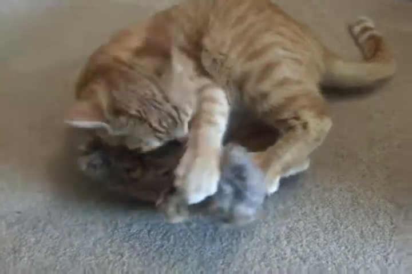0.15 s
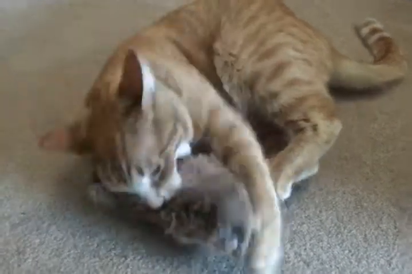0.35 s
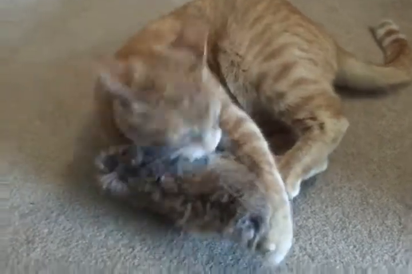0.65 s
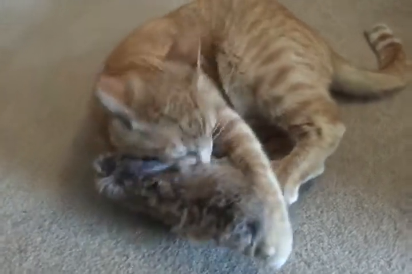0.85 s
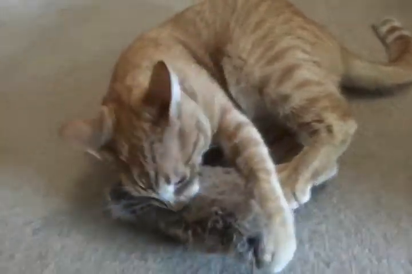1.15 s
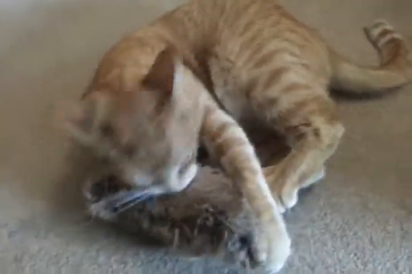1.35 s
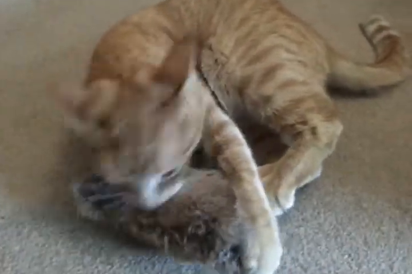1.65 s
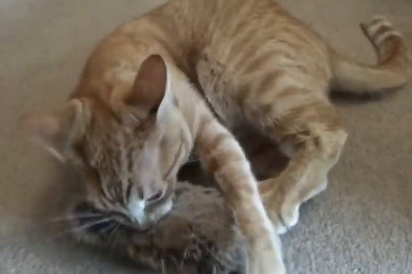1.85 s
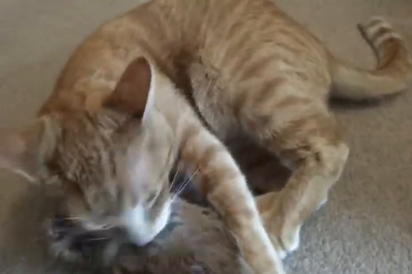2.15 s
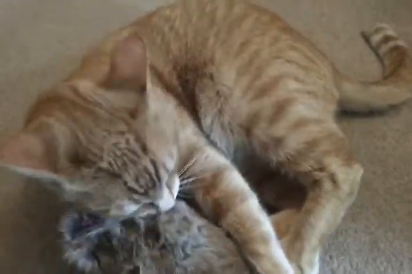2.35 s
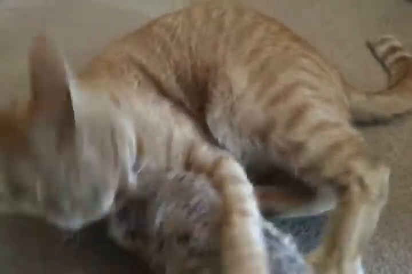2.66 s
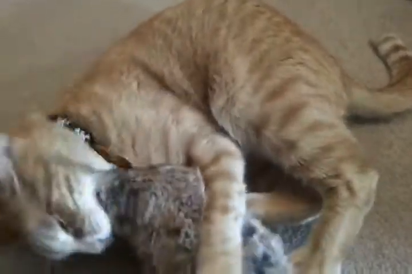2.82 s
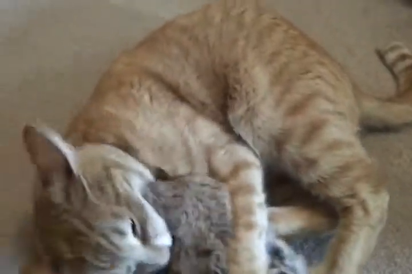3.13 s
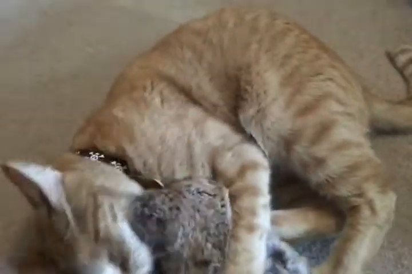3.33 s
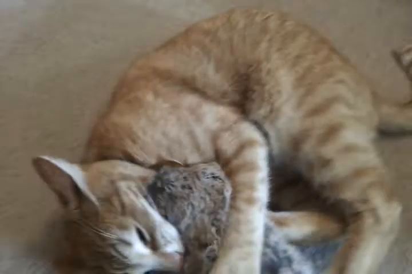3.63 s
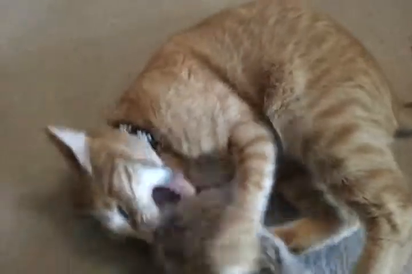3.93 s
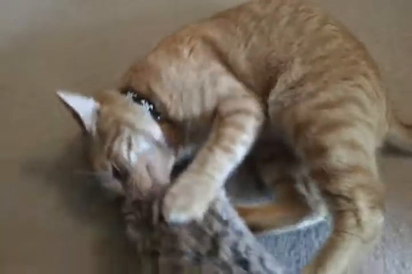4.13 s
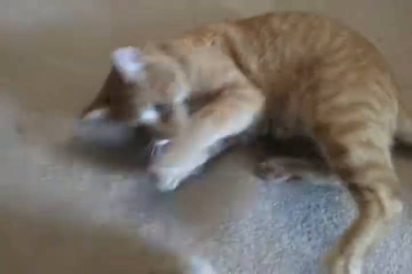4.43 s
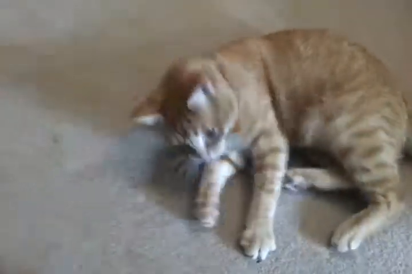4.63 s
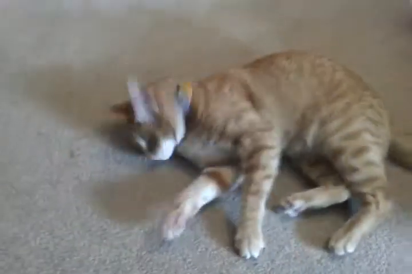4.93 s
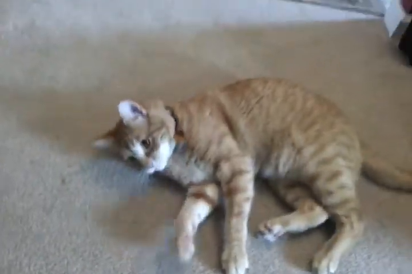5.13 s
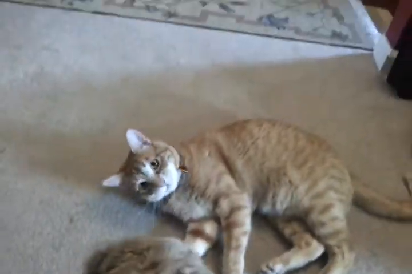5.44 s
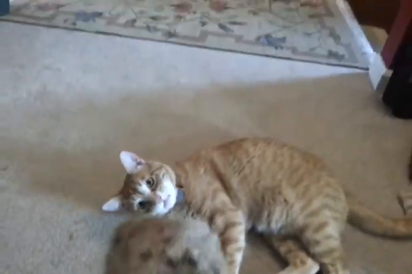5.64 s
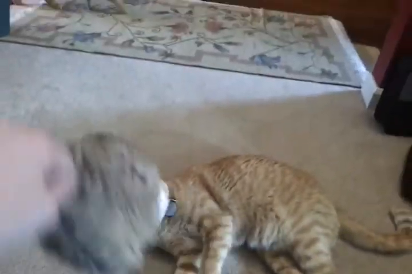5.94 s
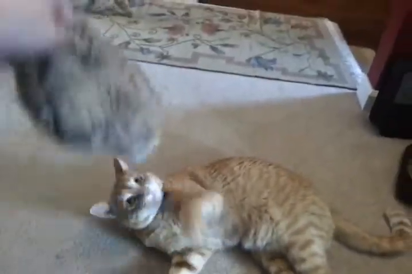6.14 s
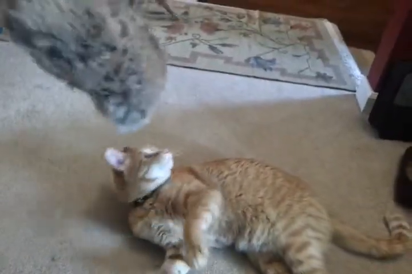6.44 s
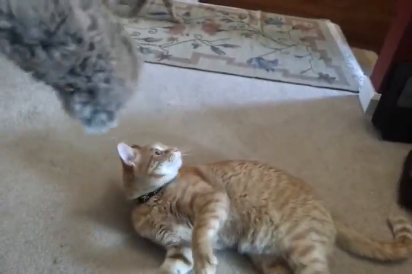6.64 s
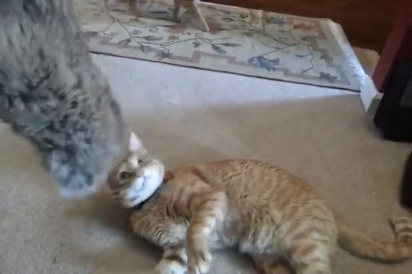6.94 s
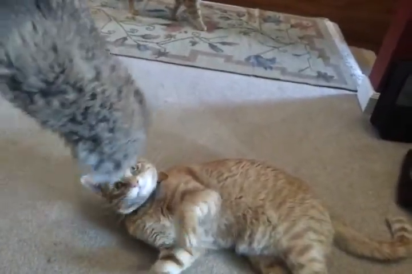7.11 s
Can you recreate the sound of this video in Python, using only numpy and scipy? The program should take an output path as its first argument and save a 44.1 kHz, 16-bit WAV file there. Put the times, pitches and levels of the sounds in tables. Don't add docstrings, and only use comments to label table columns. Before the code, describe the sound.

Close to a small camera in a quiet carpeted room, a cat wrestles a plush fur toy. Sharp claw snaps and muffled paw knocks come in irregular bursts during the first second or so, then a lull of barely audible shifting. Later come small plucks, two more crackling snatches and thin tag clinks as it bites and throws the toy. It ends in soft rustle and steady faint hiss.

```python
import sys
import numpy as np
from scipy import signal
from scipy.fft import rfft, irfft, next_fast_len
from scipy.io import wavfile
from scipy.ndimage import uniform_filter1d, minimum_filter1d, map_coordinates

SR = 44100
rng = np.random.default_rng(int(sys.argv[2]) if len(sys.argv) > 2 else 0)


def volts(x):
    e = np.asarray(x, float) / 20
    return 10 ** e


def unload_audio(sound):
    columns = np.transpose(np.atleast_2d(sound))
    steps = np.round(np.clip(columns, -1, 1) * 32767)
    wavfile.write(sys.argv[1], SR, steps.astype(np.int16))


N = 320827

# (time [s], level [dB], pitch [Hz])
WRESTLE_KNOCKS = [(.0278, -37, 900), (0.0324, -29, 1130), (.053, -57, 690), (.062, -28, 2180),
                  (0.0668, -30, 514), (.1196, -11.5, 1500), (0.195, -25.5, 943), (.2899, -38, 580),
                  (0.2999, -40, 520), (0.3443, -36, 710), (.4544, -31, 750), (.5797, -46, 880),
                  (.7433, -27.5, 810), (.746, -33.5, 900), (0.7864, -22.5, 1150), (1.0521, -27.5, 1200),
                  (1.0701, -18, 1036), (1.159, -39, 760), (1.1797, -23, 520), (1.1878, -29.5, 2220),
                  (1.211, -14.5, 2460), (1.9418, -37, 1810)]
# (time [s], level [dB], pitch [Hz])
THROW_KNOCKS = [(2.6061, -38, 520), (2.6285, -26, 1340), (2.6368, -33, 580), (2.8701, -46, 597),
                (3.3358, -45, 840), (3.939, -28.5, 674), (3.9629, -36, 735), (4.014, -45, 1100),
                (4.2855, -46, 580), (4.4068, -29.5, 710), (4.4263, -24, 1100), (4.4289, -20, 1210),
                (4.6909, -38.5, 517), (4.9927, -27.5, 1970), (5.066, -42, 1430), (5.0711, -34, 1290),
                (5.1923, -44.5, 1890)]
# (time [s], snap level [dB], snap pitch [Hz], level of a thin ring
# near 5.6 kHz [dB])
WRESTLE_SNAPS = [(.0278, -38, 3200, -45), (.0327, -29, 2060, -51), (.053, -29, 4010, -38),
                 (.055, -36, 3050, -37), (.0619, -7, 2800, -11), (.0671, -53, 2540, -38),
                 (.0865, -53, 2850, -39), (.1197, -26.5, 3240, -39), (.1951, -47, 2100, -32.5),
                 (.2899, -26, 3300, -63), (.3446, -37.5, 3630, -50), (.5047, -37.5, 4030, -37.5),
                 (.7861, -8, 4030, -5), (1.0521, -27.5, 2900, -39), (1.0701, -19.5, 1860, -30.5),
                 (1.1375, -24.5, 2400, -26), (1.159, -56, 3640, -29), (1.18, -19, 2750, -14),
                 (1.1875, -26, 3800, -22), (1.212, -21.5, 1250, -15), (1.9418, -47, 2035, -60)]
# (time [s], snap level [dB], snap pitch [Hz], level of the thin ring near 5.6 kHz
# [dB])
THROW_SNAPS = [(2.6276, -35.5, 2200, -45), (2.6366, -37.5, 2070, -44), (3.94, -41, 2100, -56),
               (4.0717, -63, 3250, -58), (4.2855, -56, 2770, -41), (4.4068, -40, 2620, -56),
               (4.4259, -40, 2550, -28), (4.4282, -34, 2550, -25), (4.4284, -36, 3950, -45),
               (4.9931, -16.5, 4340, -17), (4.9952, -44, 4400, -17), (4.998, -30, 4330, -30),
               (5.066, -25, 3200, -14), (5.0708, -36, 4400, -25), (5.0758, -26, 4360, -20),
               (5.004, -33, 4000, -30), (5.007, -33, 3000, -36), (5.012, -37.5, 4400, -34),
               (5.084, -44, 4300, -30), (5.192, -41.5, 3070, -31.5)]
# (time [s], level [dB], pitch [Hz])
FAINT_SNAPS = [(.1593, -48, 2200), (0.318, -47, 4400), (0.5993, -44, 4400), (0.998, -56, 3170),
               (1.9353, -50, 4400), (2.6606, -47, 3000), (2.7022, -46, 2820), (2.87, -46, 2100),
               (2.94, -47, 3280), (3.0307, -45.5, 3600), (3.3353, -49.5, 3570), (3.472, -42, 4400),
               (3.575, -45, 4400), (4.0367, -43, 3430), (4.553, -50, 2480), (4.7229, -41, 4060),
               (4.847, -40, 3000), (.0555, -40, 4400), (5.552, -52, 3540), (1.203, -36, 3500),
               (1.2076, -29, 4000), (1.332, -61, 4400), (2.881, -51, 4400), (2.889, -49, 4400),
               (2.929, -51, 4400), (4.439, -31, 4000), (4.4445, -44, 3000)]
# (time [s], level [dB], push width [ms], floor echo lag [ms], floor echo level [dB])
THREAD_BREAKS = [(0.0321, -27, 0.23, 0.53, -18), (.06192, -13, 0.045, .75, -19),
                 (.1215, -33, .12, 0.57, -7), (1.0525, -29, 0.062, 0.55, -14), (1.0701, -25, 0.13, 0.46, 0),
                 (1.1375, -31, .04, 0.76, -9), (1.9418, -32, 0.083, 0.61, -9), (2.6284, -26, .06, 0.76, -7),
                 (4.4253, -11.5, 0.036, 0.82, 3.5), (4.4281, -7, .06, 0.79, -6.5),
                 (4.9938, -19.5, 0.036, 0.61, -20), (5.066, -21.5, 0.047, 0.62, -19),
                 (5.0703, -25.5, 0.055, 0.89, -4), (5.0755, -32, 0.041, 0.55, -16)]
# (time [s], level [dB], pitch [Hz], decay [ms])
PINGS = [(.7858, -10.5, 5430, 0.23), (.7866, -26, 1197, 0.77), (.0625, -28.5, 1170, 0.56),
         (1.2115, -27, 2560, 1), (3.4715, -45, 5760, .7), (3.938, -43, 660, 2.2), (3.966, -48, 720, 2.),
         (1.1797, -15.5, 5800, 0.17), (1.18, -18, 7500, 0.15), (1.1372, -25, 6700, 0.28),
         (1.935, -51.5, 2500, 0.81), (1.934, -50, 6500, .8), (3.963, -50, 5050, 5.3),
         (4.071, -53, 6700, 1.), (5.487, -54, 3450, 0.55), (5.551, -52, 3000, 1.3), (5.551, -50, 3700, .8),
         (5.009, -40, 7600, .6)]
# (time [s], length [s], start level [dB], end level [dB])
SWEEPS = [(0.062, 0.014, -50, -61), (0.048, 0.009, -47, -41.5), (1.16, 0.028, -51, -45),
          (1.185, 0.027, -37, -53), (1.214, 0.013, -36, -37), (1.224, 0.043, -32.5, -36),
          (2.648, 0.016, -63, -57), (3.175, 0.0035, -61, -57), (3.479, 0.013, -61, -66),
          (4.433, 0.049, -58, -67), (4.588, 0.036, -69, -69), (4.977, 0.022, -55, -57),
          (4.992, 0.0091, -27.5, -35.5), (5.002, 0.026, -37.5, -51.5), (5.017, 0.073, -49.5, -59.5),
          (5.07, 0.0039, -26, -46), (5.077, 0.011, -31.5, -49), (5.086, 0.061, -47.5, -66),
          (5.199, 0.031, -61, -70)]
# (time [s], length [s], start level [dB], end level [dB], centre [Hz])
RUBS = [(0.109, 0.0061, -53, -41, 300), (0.191, 0.076, -55, -77, 3000), (.286, 0.038, -43, -68, 700),
        (0.887, 0.051, -59, -64.5, 4060), (0.993, 0.014, -55, -57.5, 4000), (1.182, .02, -36, -58, 2500),
        (1.203, 0.013, -45, -32, 2500), (1.212, 0.051, -53, -52, 2800), (1.727, 0.067, -62.5, -61.5, 800),
        (2.87, 0.039, -64, -68.5, 2500), (3.454, 0.032, -61.5, -51, 3080),
        (3.901, 0.099, -57.5, -59.5, 610), (3.963, 0.1, -58.5, -62, 2510), (4.226, 0.021, -61.5, -62, 690),
        (4.275, 0.034, -53, -59, 1200), (4.363, 0.034, -63, -50.5, 1800), (4.43, 0.024, -35, -43.5, 1790),
        (4.451, 0.085, -44.5, -67, 1800), (4.9, 0.14, -62, -59.5, 3000), (4.991, 0.03, -40.5, -63, 2200),
        (5.074, 0.036, -44.5, -70, 2020), (1.155, 0.025, -54, -52, 1500), (5.016, 0.043, -62, -61, 2000),
        (5.094, 0.032, -57, -70, 2010)]
# (time [s], length [s], start level [dB], end level [dB], centre [Hz])
PRESSES = [(.05, 0.0051, -27.5, -51, 253), (0.096, 0.0083, -50, -73, 251), (0.576, 0.03, -58.5, -63, 980),
           (0.787, 0.0039, -22, -37, 1150), (1.446, 0.11, -65.5, -58, 513), (2.629, 0.048, -43, -62, 590),
           (3.328, 0.014, -56.5, -54, 695), (3.578, 0.051, -60, -67, 594), (3.928, 0.018, -48.5, -41, 483),
           (3.94, 0.035, -49, -54, 610), (4.4286, 0.0071, -30, -37, 760), (4.691, 0.044, -39, -66, 179),
           (4.437, 0.026, -47, -52, 1290), (4.43, 0.01, -46, -38, 506), (1.221, .043, -49.5, -50.5, 2600),
           (5.076, 0.019, -53, -65, 1530)]
# (time [s], pitch [Hz], level [dB])
CLAW_DRAG = [
    [(4.888, 3230, -64), (4.9, 3700, -53.5), (4.92, 4320, -60), (4.942, 4500, -52), (4.958, 3100, -56.5)],
    [(4.888, 1926, -64), (4.91, 2214, -52), (4.922, 2380, -54), (4.928, 2470, -63), (4.936, 2620, -55),
     (4.96, 2460, -59)],
]
# (time [s], level [dB], pitch [Hz])
THUDS = [(.052, -33.5, 192), (0.0681, -35, 310), (0.085, -38.5, 234), (0.12, -35, 610), (.291, -36, 422),
         (0.301, -47, 570), (0.4549, -51, 600), (0.7442, -39, 595), (.787, -36, 222), (1.0527, -49, 583),
         (1.0709, -38.5, 590), (1.18, -57, 476), (1.1882, -41.5, 238), (1.2118, -43, 595),
         (2.6067, -50, 440), (2.6277, -39, 447), (2.8715, -50.5, 550), (3.9106, -49, 444),
         (3.9384, -40, 404), (4.0157, -50.5, 490), (4.2899, -48.5, 570), (4.4085, -54, 603),
         (4.4295, -25, 380), (4.691, -37, 175)]
# (pitch [Hz], time to fade by 60 dB [s])
TAG_MODES = [
    (5230, 0.076),
    (5600, 0.047),
    (6080, 0.13),
]
# (time [s], level [dB], struck place [0-2, the mode that rings best], share of full ring time)
CLINKS = [(.072, -55, .5, .4), (1.165, -48, 0, .5), (.345, -32.5, 2, 0.11), (.505, -46.5, 2, 0.3),
          (.787, -42, 0, 1.1), (2.655, -45.5, 0, .37), (2.701, -51, 0, .28), (3.471, -43.5, 1, 0.58),
          (3.575, -47, .7, 0.51), (3.964, -54, 1.3, .9), (3.976, -46, .6, 0.86), (3.985, -40.5, .55, 0.87),
          (3.995, -39, 0, 0.43), (4.012, -48, .9, .9), (4.725, -56.5, 2, 1.4), (4.975, -51, 1.2, 1.83),
          (4.995, -20.5, .8, 0.29), (5.067, -27.5, 2, 0.24), (5.066, -29, 0, 0.44), (5.078, -31, 2, 0.44),
          (5.141, -53, 2, 0.38), (5.191, -46, 2, 1.1), (5.193, -44, 0.12, 1.1), (5.472, -52.5, 2, 0.095),
          (5.552, -45, 2, 0.11), (3.966, -56, 2, .6)]
# (time [s], pitch [Hz], level [dB])
NOSE_WHISTLE = [
    (3.695, 4750, -80),
    (3.715, 5050, -76),
    (3.745, 5200, -76),
    (3.78, 4850, -76),
    (3.81, 4620, -75),
    (3.85, 4680, -76),
    (3.9, 4850, -77),
    (3.95, 4950, -80),
]
# (time [s], effort [dB], fine fur against dull weight [dB])
SHIFTS = [(0, -68, 4.5), (.22, -62, 0), (.42, -67, 1.5), (1.11, -63.5, -0.5), (1.3, -63.5, 2),
          (2.41, -69, 0), (2.65, -65, 1.5), (3.2, -66, 0.5), (3.85, -63, -0.5), (4.27, -65.5, 1),
          (4.46, -59, -3.5), (4.61, -64, 0), (5.06, -62.5, 0.5), (5.25, -69, 2), (5.57, -70.5, -1),
          (5.85, -65.5, -2), (6.3, -62.5, 0.5), (6.599, -70, 1.5)]
# (frequency [Hz], level [dB])
HISS_COLOUR = [(18, -43), (30, -7.5), (118, -7.5), (165, -3.5), (214, -7), (344, -6), (415, -9),
               (592, -4.5), (907, -6), (974, -6.5), (4650, -14.5), (6800, -15), (7700, -34), (11200, -74.5),
               (18900, -120)]
# (frequency [Hz], level [dB])
CAMERA_COLOUR = [(20, -20), (60, -8), (130, -.5), (4300, -.5), (5600, 2.5), (6300, -.5), (7400, -1),
                 (7800, -10), (8000, -17), (8400, -15), (8800, -18), (9250, -55), (22050, -90)]


def shaped(count, gain):
    size = next_fast_len(count)
    spectrum = rfft(rng.standard_normal(size)) * gain(np.fft.rfftfreq(size, 1 / SR) + 1)
    noise = irfft(spectrum, size)[:count]
    return noise / np.sqrt(np.mean(noise ** 2))


def hump(hz, octaves):
    def gain(f):
        bell = np.exp(-.5 * (np.log2(f / hz) / octaves) ** 2)
        return bell / np.sqrt(f) / (1 + (hz / 5 / f) ** 4)
    return gain


def grain(count, rate, spread_db):
    hold = max(int(SR / rate), 1)
    steps = np.repeat(rng.standard_normal(count // hold + 1), hold)
    grip = volts(spread_db * uniform_filter1d(steps, hold)[:count])
    return grip / np.sqrt(np.mean(grip ** 2))


def add(out, s, sound):
    start = max(int(s * SR), 0)
    out[start:start + len(sound)] += sound[:N - start]


def highpass(sound, hz):
    return signal.sosfilt(signal.butter(2, hz, "high", fs=SR, output="sos"), sound)


def ring(hz, ms, phase):
    t, decay_s = np.arange(1200) / SR, ms / 1000
    swell = t / decay_s * np.exp(1 - t / decay_s)
    return highpass(swell * np.sin(2 * np.pi * hz * t + phase), hz / 2)


def glide(table, wobble, wobble_hz):
    s, hz, db = np.transpose(table)
    t = np.arange(s[0], s[-1], 1 / SR)
    waver = shaped(len(t) + 9000, hump(wobble_hz, 1.4))[:len(t)]
    pitch = np.interp(t, s, hz) * (1 + wobble * waver)
    tone = np.sin(2 * np.pi * np.cumsum(pitch) / SR)
    out = np.zeros(N)
    add(out, s[0], np.sqrt(2) * volts(np.interp(t, s, db)) * tone)
    return out


def snags():
    knock_ms, snap_ms, tick_ms = 0.38, 0.42, 0.36
    tick_hz, edge_hz, edge_db = 5640, 7100, -20.5
    rise_s, floor_late_s, floor_db = .00025, .00078, -12
    releases = [(s, [(db, hz, knock_ms)]) for s, db, hz in WRESTLE_KNOCKS + THROW_KNOCKS]
    faint_snaps = [(s, db, hz, db + 0.5) for s, db, hz in FAINT_SNAPS]
    for s, snap_db, snap_hz, tick_db in WRESTLE_SNAPS + THROW_SNAPS + faint_snaps:
        snap = (snap_db, snap_hz, snap_ms)
        tick = (tick_db, tick_hz, tick_ms)
        edge = (tick_db + edge_db, edge_hz, tick_ms)
        releases.append((s, [snap, tick, edge]))
    out = np.zeros(N)
    chances = np.tanh(rng.standard_normal((len(releases), 4)))
    for (s, parts), (detune, turn, late, strength) in zip(releases, chances):
        release = np.zeros(1200)
        for db, hz, ms_at_1k in parts:
            decay_ms = ms_at_1k * np.sqrt(1000 / hz)
            release += volts(db) * ring(hz * (1 + 0.014 * detune), decay_ms, phase=2 * turn)
        add(out, s - rise_s, release)
        floor_s = floor_late_s + 0.00019 * late
        add(out, s - rise_s + floor_s, volts(floor_db + 5.1 * strength) * release)
    return out


def thread_breaks():
    lead = 40
    t_ms = np.arange(-lead, 200) / SR * 1000
    out = np.zeros(N)
    for s, db, push_ms, lag_ms, floor_db in THREAD_BREAKS:
        push = np.exp(-.5 * (t_ms / push_ms) ** 2)
        floor = np.exp(-.5 * ((t_ms - lag_ms) / push_ms) ** 2)
        add(out, s - lead / SR, volts(db) * (push + volts(floor_db) * floor))
    return highpass(out, 900)


def pings():
    out = np.zeros(N)
    for s, db, hz, ms in PINGS:
        add(out, s, volts(db) * ring(hz, ms, phase=0))
    return out


def scrapes():
    sweep_hz, sweep_oct, rub_oct, press_oct = 6070, 0.44, 1.46, 0.51
    floor_lag_ms, floor_db = .72, -7
    rows = [(*row, sweep_hz, sweep_oct) for row in SWEEPS]
    rows += [(*row, rub_oct) for row in RUBS]
    rows += [(*row, press_oct) for row in PRESSES]
    out = np.zeros(N)
    for s, length, start_db, end_db, hz, octaves in rows:
        n = int(max(length, .004) * SR)
        count = np.arange(n)
        edge = np.minimum(np.minimum(count / 60, count[::-1] / 120), 1)
        fibres = shaped(9000, hump(hz, octaves))[:n]
        grip = grain(9000, rate=900, spread_db=2.2)[:n]
        add(out, s, fibres * grip * edge * volts(np.linspace(start_db, end_db, n)))
    floor = map_coordinates(out, [np.arange(N) - floor_lag_ms * SR / 1000], order=3)
    return out + volts(floor_db) * floor


def claw_drag():
    bands = sum(glide(band, wobble=.09, wobble_hz=350) for band in CLAW_DRAG)
    return bands * grain(N, rate=270, spread_db=3.5)


def thuds():
    decay_ms = 1.055
    out = np.zeros(N)
    for s, db, hz in THUDS:
        bump = highpass(ring(hz, decay_ms, phase=rng.standard_normal()), hz / 3)
        add(out, s - decay_ms / 1000, volts(db + 3.5) * bump)
    return out


def collar_tag():
    off_place_db = -12
    out, t = np.zeros(N), np.arange(9000) / SR
    for s, db, place, share in CLINKS:
        for k, (hz, t60) in enumerate(TAG_MODES):
            detune, phase = rng.standard_normal(2)
            level_db = db + off_place_db * abs(k - place) - 60 * t / (t60 * share)
            onset = np.minimum(t / .0004, 1)
            tone = np.sin(2 * np.pi * hz * (1 + .003 * detune) * t + phase)
            add(out, s, volts(level_db) * onset * tone)
    return out


def nose_whistle():
    return volts(6) * glide(NOSE_WHISTLE, wobble=.005, wobble_hz=60)


def body_shifting():
    middle_swing, resting_db = 1.5, -66
    s, effort_db, fur_db = np.transpose(SHIFTS)
    weight_level = effort_db - fur_db - .6
    middle_level = resting_db + middle_swing * (effort_db - resting_db)
    fur_level = effort_db + fur_db + .6
    fur_hump = hump(5700, 1.0)
    layers = [(weight_level, hump(420, .7)), (middle_level, hump(1600, 1.0)),
              (fur_level, lambda f: fur_hump(f) / (1 + (f / 7000) ** 10))]
    t = np.arange(N) / SR
    rustle = sum(volts(np.interp(t, s, db) - 4.0) * shaped(N, band) for db, band in layers)
    return rustle * grain(N, rate=47, spread_db=1.0)


def hiss():
    hz, db = np.transpose(HISS_COLOUR[:-2])
    def gain(f):
        return volts(np.maximum(np.interp(np.log(f), np.log(hz), db), -25))
    return volts(-64.5) * shaped(N, gain)


def room_tail(close):
    t = np.arange(6000) / SR
    fade = volts(-66.5 - 60 * t / 0.093)
    tail = fade * shaped(len(t), hump(2500, 1.7)) * (t > .002)
    return signal.fftconvolve(close, tail)[:N]


def scene():
    close = snags() + thread_breaks() + pings() + scrapes() + claw_drag() + thuds() + collar_tag()
    return (close + room_tail(close) + nose_whistle() + body_shifting() + hiss())[None]


def top_cut(x):
    return signal.sosfilt(signal.butter(12, 16910, fs=SR, output="sos"), x)


def record(dry):
    limit, shaved = .8, .13
    duck_db, duck_s, duck_late_s = -7, 0.029, .004
    hz, db = np.transpose(CAMERA_COLOUR)
    size = next_fast_len(N)
    colour = volts(np.interp(np.log(np.fft.rfftfreq(size, 1 / SR) + 1), np.log(hz), db))
    x = irfft(rfft(dry, size) * colour, size)[:, :N]
    safe_gain = np.minimum(limit / (np.abs(x) + 1e-9), 1)
    x = x * uniform_filter1d(minimum_filter1d(safe_gain, size=241), size=121)
    top = np.argmax(np.abs(x[0]))
    x[0, top] -= shaved * np.sign(x[0, top])
    since = (np.arange(N) - top) / SR - duck_late_s
    dip = np.clip(since / .004, 0, 1) * np.exp(-np.abs(since) / duck_s)
    x = x * volts(duck_db * dip)
    x = signal.sosfilt(signal.ellip(8, .2, 70, 16300, fs=SR, output="sos"), x)
    return top_cut(x)


dry = scene()
out = record(dry)
unload_audio(out)
```